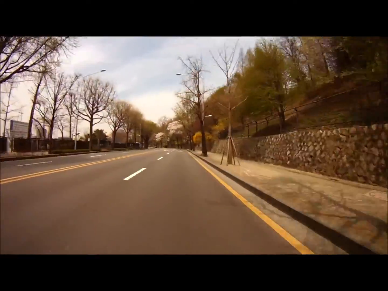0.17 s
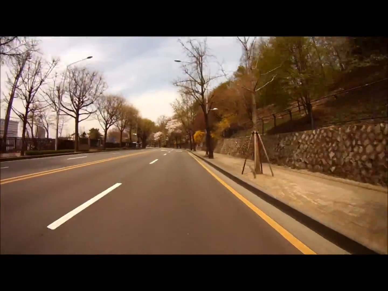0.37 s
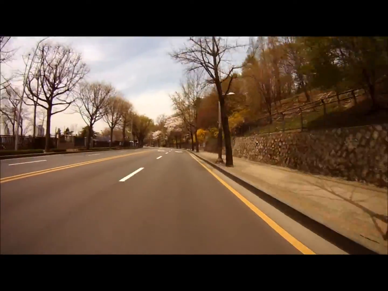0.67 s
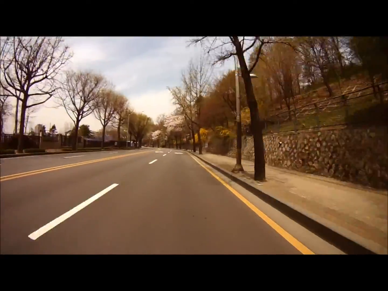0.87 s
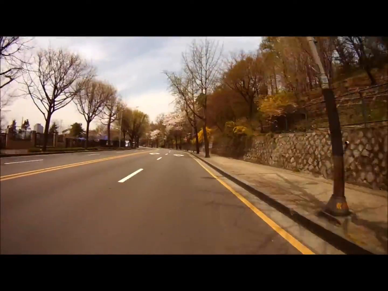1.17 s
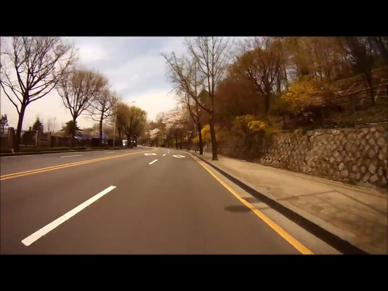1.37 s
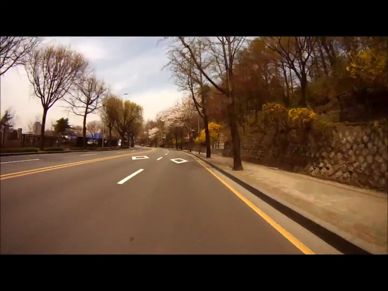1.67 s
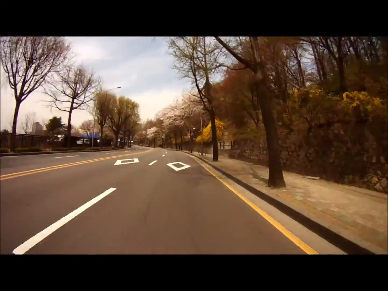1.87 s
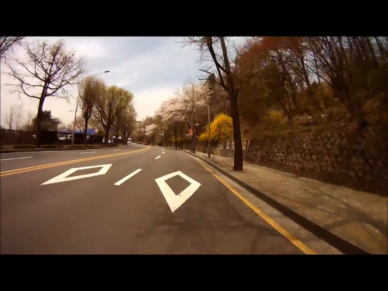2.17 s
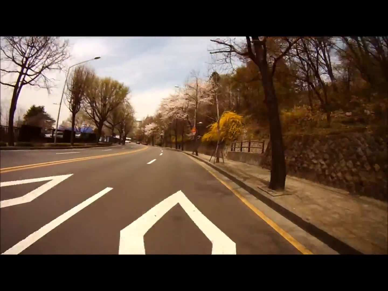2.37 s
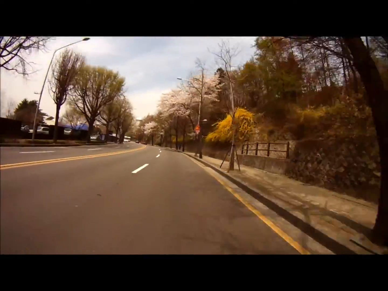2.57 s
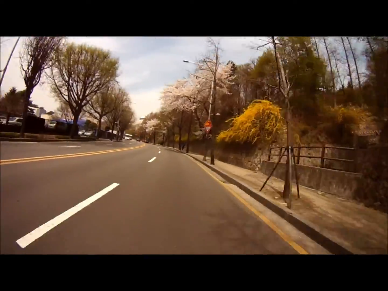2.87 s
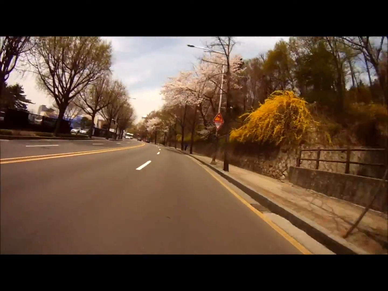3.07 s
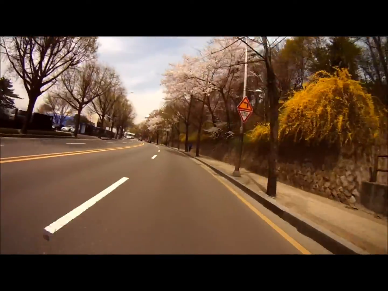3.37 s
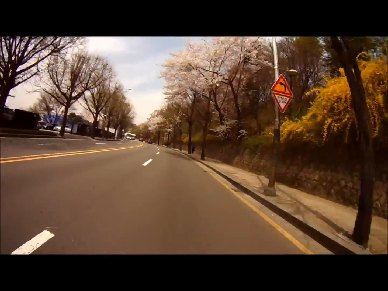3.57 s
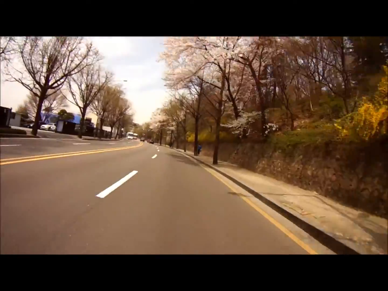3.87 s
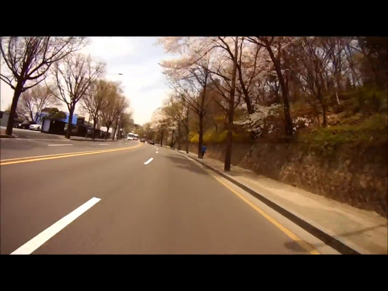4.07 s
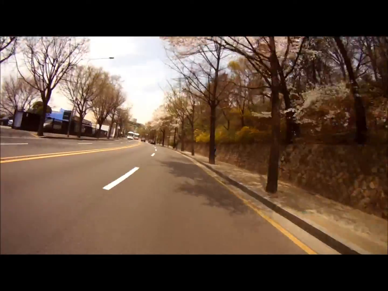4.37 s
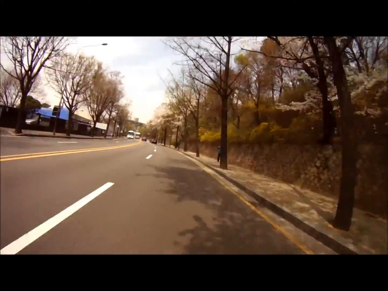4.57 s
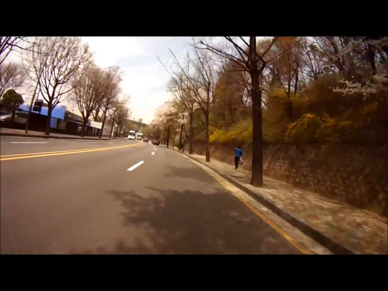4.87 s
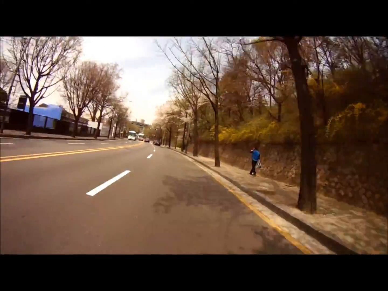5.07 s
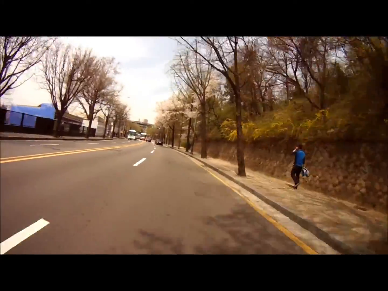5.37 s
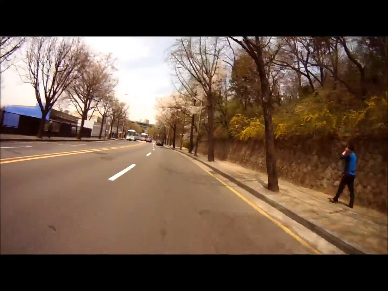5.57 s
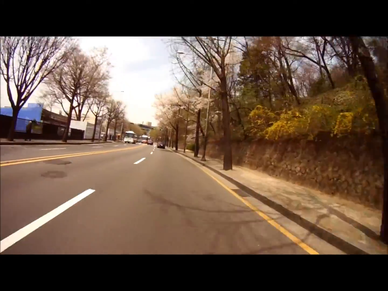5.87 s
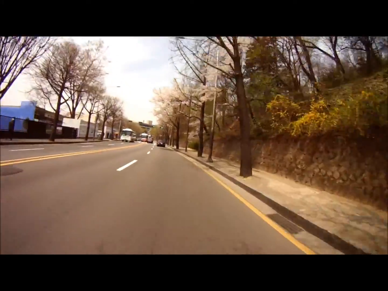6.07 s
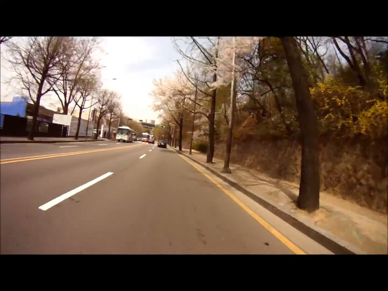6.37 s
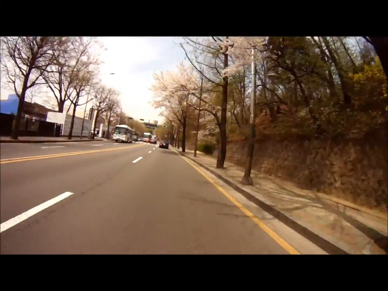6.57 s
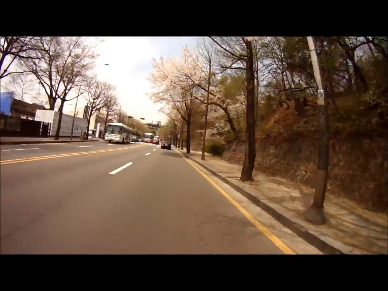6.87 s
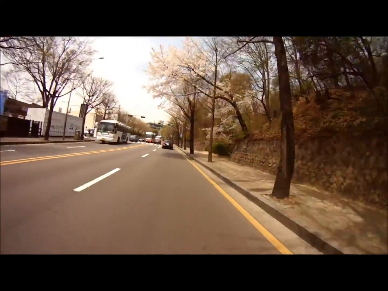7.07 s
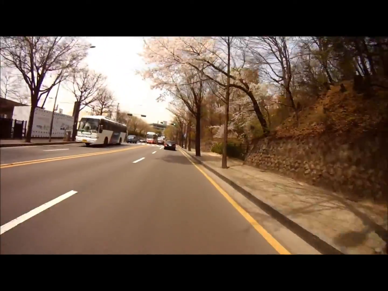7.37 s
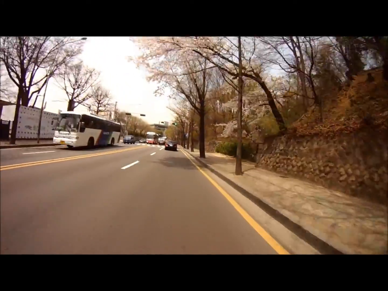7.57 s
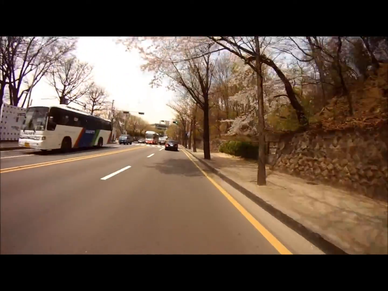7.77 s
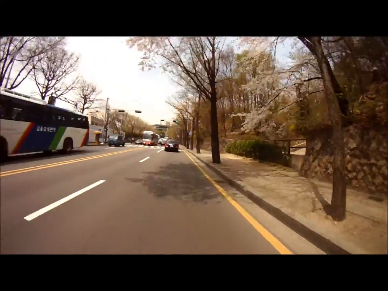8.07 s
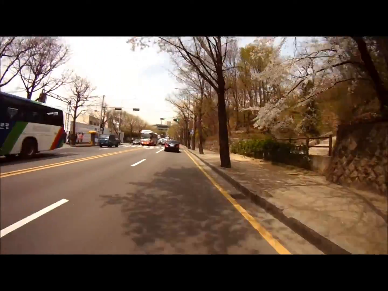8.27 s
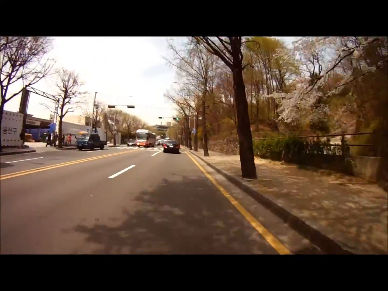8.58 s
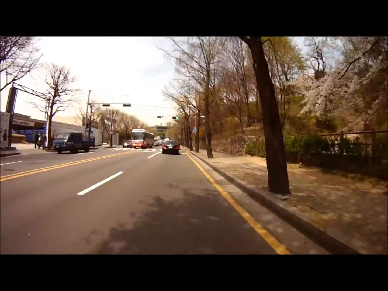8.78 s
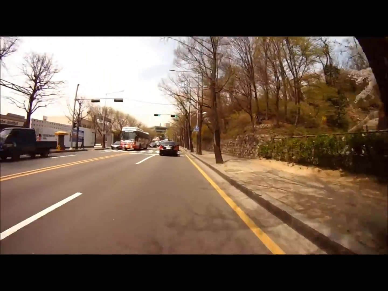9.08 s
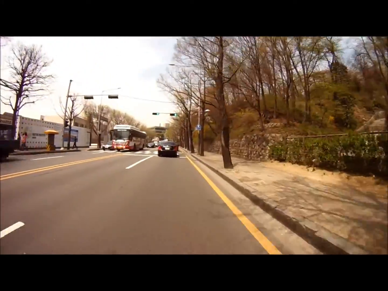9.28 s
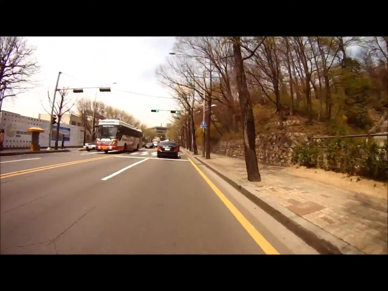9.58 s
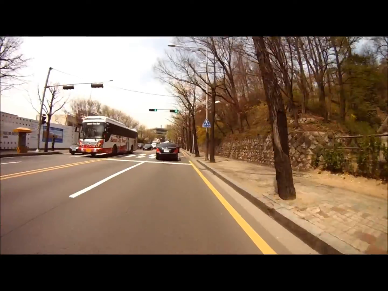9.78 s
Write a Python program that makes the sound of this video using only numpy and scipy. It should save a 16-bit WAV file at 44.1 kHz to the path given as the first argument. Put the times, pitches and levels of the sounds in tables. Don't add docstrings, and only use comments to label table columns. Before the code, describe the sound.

From 0 to about 4 seconds a motorcycle holds a low, buzzing engine drone, its pitch sliding slowly down, while loud turbulent air hisses, gusts and thumps over a closed camera housing. Road bumps shake the mount in irregular low shudders, with a boxy hum from the shell on rough patches. From 4 to 6 seconds the wind weakens in steps and the engine eases off; near 6 the throttle closes. Between 6 and 6.8 small dry plastic ticks scatter, the engine tone sinks and fades out, and a hard hollow knock with a short rattle lands around 6.85. A lighter knock comes at 7.3, a tick at 7.5. From there to about 10 seconds it coasts: faint low hums slowly descending, weak air and road rumble, a dull knock at 8.5 and several soft ones after 9.4. Everything is close, muffled and mono.

```python
import sys
import numpy as np
from scipy import signal
from scipy.fft import rfft, irfft
from scipy.io import wavfile
from scipy.ndimage import uniform_filter1d

SR = 44100
rng = np.random.default_rng(int(sys.argv[2]) if len(sys.argv) > 2 else 0)


def dump(signal):
    limited = np.clip(np.atleast_2d(signal).T, -1, 1)
    pcm = np.round(limited * 32767).astype(np.int16)
    wavfile.write(sys.argv[1], SR, pcm)


def level_to_linear(level):
    exponent = np.asarray(level, float) / 20
    return 10 ** exponent


N = 438354


def unit(x):
    return x / np.sqrt(np.mean(x ** 2))


def curves(table):
    s, *columns = np.transpose(table)
    t = np.arange(N) / SR
    fade_s = .2
    gate = np.clip(np.minimum(t - s[0] + fade_s, s[-1] + fade_s - t) / fade_s, 0, 1)
    return gate, *(np.interp(t, s, c) for c in columns)


def coloured(points, lo_hz, hi_hz):
    hz = np.arange(N // 2 + 1) * SR / N + 1e-3
    at, db = np.transpose(points)
    shape = level_to_linear(np.interp(np.log(hz), np.log(at), db, left=-150, right=-150))
    power = np.sum(shape[(hz > lo_hz) & (hz < hi_hz)] ** 2)
    return irfft(rfft(rng.standard_normal(N)) * shape, N) * np.sqrt(N / 2 / power)


def resonance(hz, width_hz):
    peak = signal.iirpeak(hz, hz / width_hz, fs=SR)
    once = signal.lfilter(*peak, rng.standard_normal(N))
    return unit(signal.lfilter(*peak, once))


def even(x, window_s, firmness):
    size = np.sqrt(uniform_filter1d(x ** 2, int(window_s * SR))) + 1e-9
    return unit(x / size ** firmness)


def walk(rate):
    step = 32
    k, n = int(SR / step / rate), N // step + 1
    held = np.repeat(rng.standard_normal(n // k + 1), k)
    slewed = uniform_filter1d(uniform_filter1d(held, k), k)
    return np.interp(np.arange(N), step * np.arange(n), unit(slewed[:n]))


def swells(base_db, events):
    t = np.arange(0, N, 64) / SR
    power = sum(level_to_linear(2 * db - 15 * ((t - s) / half) ** 2) for s, db, half in events)
    return 10 * np.log10(level_to_linear(2 * base_db) + np.interp(np.arange(N) / SR, t, power))


def follow(law, wind_db):
    at_db, slope, still_db = law
    return 10 * np.log10(level_to_linear(2 * (at_db + slope * (wind_db + 30))) + level_to_linear(2 * still_db))


def tone(hz, db, shimmer_db=1.1):
    phase = 2 * np.pi * (np.cumsum(hz) / SR + rng.random())
    return np.sqrt(2) * level_to_linear(db + shimmer_db * walk(8)) * np.sin(phase)


def add(out, s, db, carrier, t60, rise):
    start = int(s * SR)
    t = np.arange(min(len(carrier), N - start)) / SR
    ring = carrier[:len(t)] * np.exp(-np.log(1000) * t / t60) * (1 - np.exp(-t / rise)) ** 2
    out[start:][:len(t)] += level_to_linear(db) * ring / np.abs(ring).max()


# t/s, level/dB, half length/s
BUMPS = [(.03, -17, 0.02), (0.43, -23.5, .14), (.83, -16.5, .05), (1.02, -16.5, 0.031), (1.878, -26, 0.054),
         (2.188, -18.5, 0.048), (2.477, -28, 0.049), (2.63, -23, 0.028), (2.79, -21.5, 0.089),
         (3.015, -17.5, 0.032), (3.126, -21, 0.029), (3.32, -16, .05), (3.564, -21, .03),
         (3.917, -19, 0.085), (4.148, -19.5, 0.036), (4.284, -23.5, .06), (4.63, -18.5, 0.046),
         (4.764, -16.5, 0.033), (4.885, -20, 0.069), (5.07, -21, 0.043), (5.362, -20, 0.15),
         (5.76, -22, .16), (6.36, -27, .14), (6.754, -23, .05), (6.895, -19, 0.048), (7.13, -29, .09),
         (7.4, -29, .08), (7.66, -29, 0.12), (8.06, -24.5, 0.052), (8.63, -27.5, 0.077)]
# t/s, level/dB, half length/s
SURFACE_PATCHES = [(.05, -32, .12), (.4, -31, .12), (.7, -34, .08), (.95, -32, .04), (1.85, -33, .05),
                   (2.4, -33, .15), (2.68, -33, .05), (2.95, -33, .07), (3.25, -34, .08), (3.45, -35, .05),
                   (3.77, -35, .04), (4.6, -33, .04), (4.76, -32, .03), (6.45, -43, .15), (7.22, -43, .05),
                   (7.8, -45, .1), (8.8, -45, .07), (9.36, -45, .05)]
# level/dB at wind -30 dB, slope/dB per dB, still-air level/dB
SWING_LAW = (-30.5, 0.26, -35.5)
HUM_LAW = (-35, 0.59, -44)
# f/Hz, density/dB per Hz
SHELL = [(240, -47), (400, -20), (427, -11), (488, -15.5), (523, -1.5), (565, -6), (605, 0.5), (656, 0),
         (727, -9.5), (771, -7), (885, -8), (933, -16.5), (1000, -12.5), (1300, -45.5), (2200, -120)]
FLOOR = [(850, -23.5), (1050, 1.5), (1180, -5.5), (1520, -0.5), (2000, -14), (2360, -12.5), (2700, -28.5),
         (3150, -13.5), (3430, -33.5), (3950, -21), (5200, -24.5), (7500, -29.5), (9500, -41.5),
         (14400, -46)]


def road():
    mount_hz, mount_width_hz = 132.5, 13
    lock_width_hz, lock_share = 11.7, 0.88
    air_db = curves(WIND)[1]
    swing_db = swells(follow(SWING_LAW, air_db) + 1.5 * walk(11), BUMPS) - 1.0
    hum_db = swells(follow(HUM_LAW, air_db) - 1.3, SURFACE_PATCHES) - 1.3 + .8 * walk(22)
    floor_db = -54.5 + .6 * walk(11)
    gate, crank_hz, *_ = curves(ENGINE)
    swing = even(resonance(mount_hz, mount_width_hz), .03, 0.75)
    lock = gate * lock_share * np.exp(-((2 * crank_hz - mount_hz) / lock_width_hz) ** 4)
    pulled = tone(2 * crank_hz, 0, shimmer_db=-0.5)
    swing = np.sqrt(1 - lock) * swing + np.sqrt(lock) * pulled
    hum = coloured(SHELL, 450, 800)
    floor = coloured(FLOOR, 900, 14500)
    return level_to_linear(swing_db) * swing + level_to_linear(hum_db) * hum + level_to_linear(floor_db) * floor


# t/s, peak level/dB, 3.1 kHz ring share/dB, brightness (-1 to 1)
TICKS = [(6.0774, -31, -13, 0.024), (6.2672, -32, -6, -.6), (6.336, -25, -8, -0.11), (6.396, -40, -12, -.3),
         (6.6128, -24, -12, 0.13), (6.7004, -40, 0, .2), (6.7404, -33, -11, -1.1), (7.4854, -26, -6, -.9),
         (7.6384, -43, -9, .2), (8.1469, -40, -12, -.1), (8.2701, -43, -12, 0.27), (9.1042, -46, -8, -.2)]
# f/Hz, scatter/Hz, t60/s
RINGS = [(1880, 60, 0.04), (2230, 350, .02), (3134, 110, .022), (3980, 100, 0.025), (3650, 200, .012),
         (4900, 300, 0.019), (4950, 270, 0.0079)]
TICK_DB = (-10, -14.5, -19.5)
BRIGHT_DB = (-1, 13, 14)
# t/s, peak level/dB, f/Hz, t60/s
KNOCKS = [(6.8485, -16.5, 600, 0.023), (6.8585, -20, 666, 0.039), (6.862, -29, 560, .03),
          (7.3165, -26.5, 653, 0.059), (7.328, -33, 610, .05), (8.480, -32, 607, 0.085),
          (9.440, -46, 624, 0.045), (9.670, -31.5, 640, .08), (9.690, -34, 650, 0.072),
          (9.848, -33, 650, 0.067), (9.880, -33, 628, 0.074), (6.271, -32, 1490, 0.078),
          (6.490, -43, 2360, 0.021), (6.497, -43, 2205, 0.035), (6.506, -46, 2360, 0.025)]
# t/s, peak level/dB, centre f/Hz, width/Hz, t60/s
RATTLES = [
    (6.846, -46, 4250, 800, .035),
    (6.851, -61, 7400, 2200, .08),
    (6.490, -51, 4700, 500, .02),
    (6.506, -53, 4800, 600, .025),
    (8.27, -56, 4800, 600, .03),
    (9.444, -37.5, 1500, 500, .07),
    (7.318, -42, 1200, 600, .04),
    (7.345, -52.5, 3100, 2200, .08),
]


def housing():
    out, t = np.zeros(N), np.arange(SR // 8) / SR
    group = (0, 0, 1, 2, 2, 3, 3)
    snap = signal.butter(2, (1700, 5300), "band", fs=SR, output="sos")
    chances = rng.uniform(-0.84, .5, (len(TICKS), len(RINGS)))
    for (s, db, ring_db, bright), chance in zip(TICKS, chances):
        add(out, s, db - 15, signal.sosfilt(snap, rng.standard_normal(len(t))), .014, .0007)
        plain_db = np.add(TICK_DB, np.multiply(bright, BRIGHT_DB))
        shares = np.insert(plain_db, 1, ring_db)
        for k, (hz, scatter, t60) in enumerate(RINGS):
            mode = np.sin(2 * np.pi * (hz + scatter * chance[k]) * t)
            add(out, s, db + shares[group[k]] - 1.0, mode, t60, .0008)
    count = 50
    times, levels = rng.uniform(5.9, 9.7, size=count), rng.uniform(-66.5, -60, size=count)
    for s, db, k in zip(times, levels, rng.integers(len(RINGS), size=count)):
        hz, _, t60 = RINGS[k]
        add(out, s, db, np.sin(2 * np.pi * hz * t), t60, .0008)
    out = signal.sosfilt(signal.butter(8, 5500, fs=SR, output="sos"), out)
    for s, db, hz, t60 in KNOCKS:
        add(out, s, db, np.sin(2 * np.pi * hz * t), t60, .0022)
    for s, db, hz, width, t60 in RATTLES:
        band = signal.butter(2, (hz - width / 2, hz + width / 2), "band", fs=SR, output="sos")
        add(out, s, db, signal.sosfilt(band, rng.standard_normal(len(t))), t60, .0015)
    clip_db = -73.5 + 1.5 * walk(13)
    return out + level_to_linear(clip_db) * resonance(3140, 120)


# t/s, level/dB
WIND = [(0, -27.5), (.55, -28), (1.0, -26.5), (1.9, -26.5), (2.4, -30), (2.9, -27), (3.3, -26.5),
        (4.15, -28.5), (4.85, -32.5), (5.23, -32), (5.3, -35), (6.19, -38.5), (6.23, -42.5), (6.66, -48.5),
        (8.2, -49.5), (8.55, -60), (9.3, -54), (9.94, -59.5)]
# t/s, level/dB, half length/s
GUSTS = [(0.637, -31.5, .05), (0.966, -29, .04), (1.3, -31, 0.069), (1.47, -28, .22), (1.57, -26, .05),
         (2.6, -27, .06), (2.7, -27, .08), (3.253, -31, 0.068), (3.7, -33, 0.088), (4.05, -32.5, .06),
         (5.62, -40, .05), (5.922, -40, .05), (6.14, -38, .07), (7.333, -46.5, 0.037), (7.55, -48, 0.054)]
BUFFETS = [(.08, -23, 0.076), (0.612, -19, .03), (1.142, -20, 0.047), (1.3, -22, .03), (1.414, -19, 0.035),
           (1.655, -19, 0.076), (1.97, -22, 0.046), (2.304, -26, .05), (2.692, -18, 0.057),
           (2.945, -21, 0.04), (3.47, -18.5, .05), (3.963, -18.5, .03), (4.164, -20.5, 0.058),
           (4.5, -24, .06), (4.73, -26, .04), (4.932, -25, 0.039), (5.2, -29, 0.037), (6.01, -23, 0.043),
           (6.21, -25.5, 0.064), (6.4, -26, 0.07), (7.295, -32, .06), (9.75, -30, 0.027),
           (9.88, -33, 0.033)]
# level/dB at wind -30 dB, slope/dB per dB, still-air level/dB
TREBLE_LAW = (-41.5, 1.29, -70)
BUFFET_LAW = (-26, .7, -37)
# f/Hz, density/dB per Hz
HISS = [(500, -40.5), (800, -14.5), (1170, -6.5), (1550, 2), (2100, -14), (3310, -21), (3750, -18.5),
        (4700, -28), (5300, -36.5), (6000, -43.5), (7000, -47.5), (8200, -58), (10500, -67), (14400, -74.5)]
RUSH = [(140, 1.5), (180, -2.5), (230, -6), (300, -11.5), (380, -15.5), (460, -14), (520, -17.5)]
BUFFET = [(12, -15), (20, 3.5), (54, -0.5), (100, -5), (150, -9.5), (185, -21.5)]
# f/Hz, width/Hz, level/dB against the hiss
PANELS = [(492, 18, -20.5), (676, 7.7, -20.5), (723, 9.2, -20)]


def wind():
    air_db = curves(WIND)[1]
    hiss_db = swells(air_db, GUSTS)
    treble_db = follow(TREBLE_LAW, uniform_filter1d(hiss_db, int(.045 * SR)))
    buffet_db = swells(follow(BUFFET_LAW, air_db) + 1.5 * walk(9.8), BUFFETS) - 0.14
    eddies = .3 * walk(22) + 1.07 * walk(50)
    hiss = coloured(HISS, 1150, 1800)
    low = signal.sosfiltfilt(signal.butter(2, 2100, fs=SR, output="sos"), hiss)
    treble = unit(hiss - low) + level_to_linear(-41) * resonance(8060, 900)
    fine_eddies = 0.13 * eddies + 0.6 * walk(30) + 1.22 * walk(75)
    treble = treble * level_to_linear(treble_db + 3.0 + fine_eddies)
    panels = sum(level_to_linear(db) * resonance(hz, width) for hz, width, db in PANELS)
    gust_db = uniform_filter1d(np.maximum(hiss_db, -52), int(.3 * SR))
    rush = level_to_linear(0.64 * gust_db - 24) * coloured(RUSH, 245, 448)
    buffet = level_to_linear(buffet_db) * even(coloured(BUFFET, 20, 105), 0.1, 0.38)
    return level_to_linear(hiss_db - 0.18 + eddies) * (low + panels) + treble + rush + buffet


# f/Hz, width/Hz, level/dB
FRAME = [(54.5, 5.6, -25), (75.2, 11.7, -25.5), (161.7, 20, -36), (220, 14, -40.5), (333, 26, -43.5),
         (525, 60, -44.5), (571, 18, -41.5), (636, 36, -37), (728, 24, -34)]


def frame(hz):
    slow = hz[::256]
    power = sum(level_to_linear(2 * db) / (1 + (2 * (slow - f) / w) ** 4) for f, w, db in FRAME)
    return np.interp(np.arange(N), np.arange(0, N, 256), 10 * np.log10(power))


# t/s, crank f/Hz, load level/dB
ENGINE = [
    (0, 86, -1),
    (1, 84.6, -1),
    (2, 81.5, -0.5),
    (3, 78.4, 0),
    (4, 73.9, 0),
    (5, 69, -1.5),
    (5.5, 65.5, -4),
    (6, 61.6, -13),
    (6.5, 55.6, -10),
]
ORDER_DB = (0.3, 0.54, -1, -1, 0.3, -6, -11)
# t/s, f/Hz, level/dB
COAST = [
    (7.4, 55.8, -38),
    (7.9, 57.25, -33),
    (8.4, 55.1, -39.5),
    (8.9, 53.16, -35.5),
    (9.4, 51.6, -36.5),
    (9.9, 46.6, -53),
]
# t/s, f/Hz, level/dB
WHEEL = [
    (5.7, 266, -61),
    (5.95, 259.6, -47),
    (6.65, 231, -60),
    (7.1, 216, -40.5),
    (7.3, 212, -43),
    (7.45, 208.5, -59),
    (7.8, 202, -50.5),
    (8.4, 192.3, -53),
    (9.3, 180.7, -53),
]
# t/s, f/Hz, level/dB, octave level/dB
SHAFT = [
    (8.4, 121.7, -32, -67),
    (8.7, 118.8, -42, -55),
    (9.0, 113.9, -35, -56),
    (9.3, 113.7, -45, -59),
    (9.6, 109.2, -40.5, -47),
    (9.9, 111.5, -42, -53.5),
]


def drivetrain():
    chain_teeth, gear_teeth = 6.67, 8.55
    gate, hz, load_db = curves(ENGINE)
    wobble = hz * (1 + .0015 * walk(12))
    out = np.zeros(N)
    for k, db in zip((1, 2, 3, 4, chain_teeth, 8, gear_teeth), ORDER_DB):
        out += gate * tone(k * wobble, load_db + db + frame(k * hz))
    for table in (COAST, WHEEL, SHAFT):
        gate, hz, *order_db = curves(table)
        hz = hz * (1 + .0015 * walk(12))
        for k, db in enumerate(order_db, 1):
            out += gate * tone(k * hz, db)
    return out


def scene():
    return (road() + housing() + wind() + drivetrain())[None]


def top_cut(x):
    return signal.sosfilt(signal.butter(12, 14200, fs=SR, output="sos"), x)


def record(dry):
    noisy = dry + level_to_linear(-84) * rng.standard_normal(dry.shape)
    mix = np.tanh(0.6 * noisy) / 0.6
    return top_cut(mix)


dry = scene()
out = record(dry)
dump(out)
```